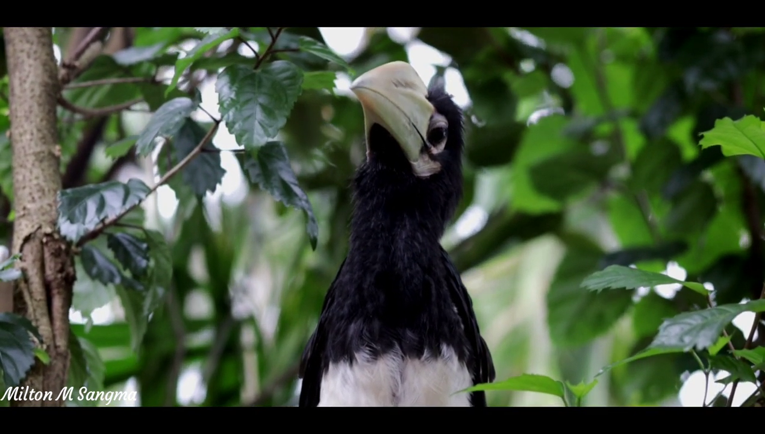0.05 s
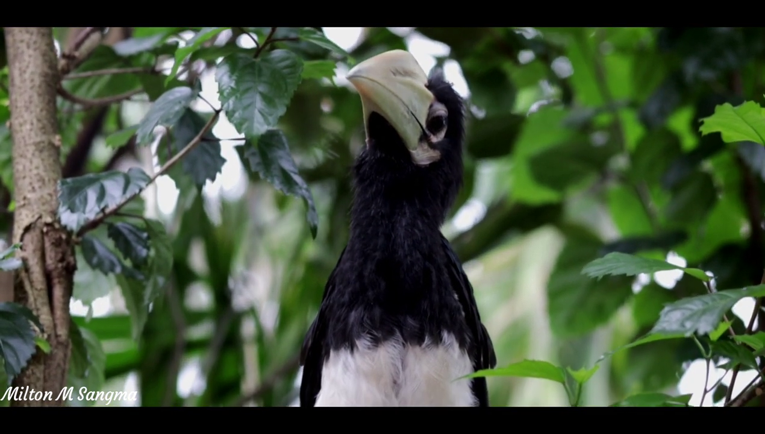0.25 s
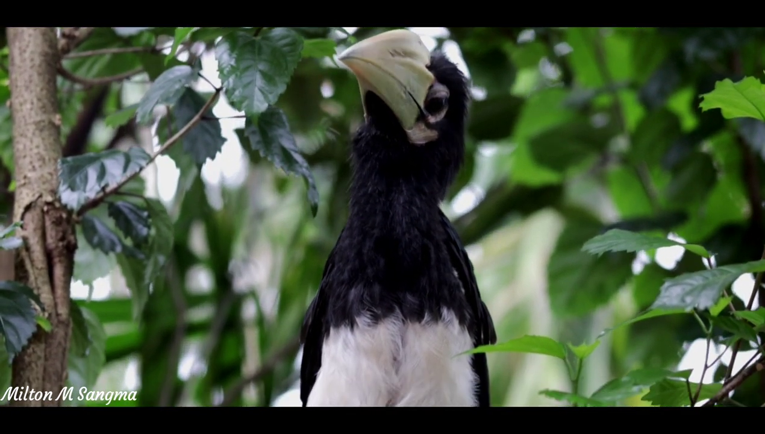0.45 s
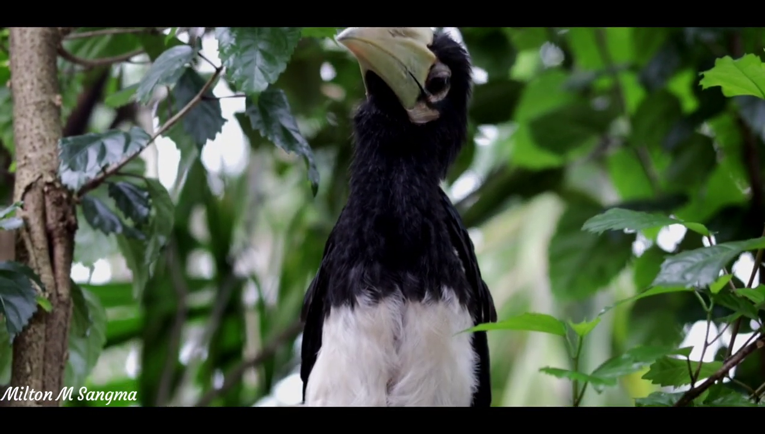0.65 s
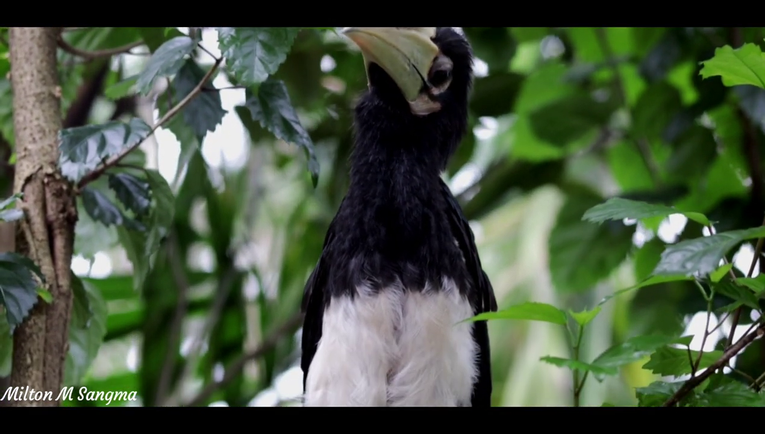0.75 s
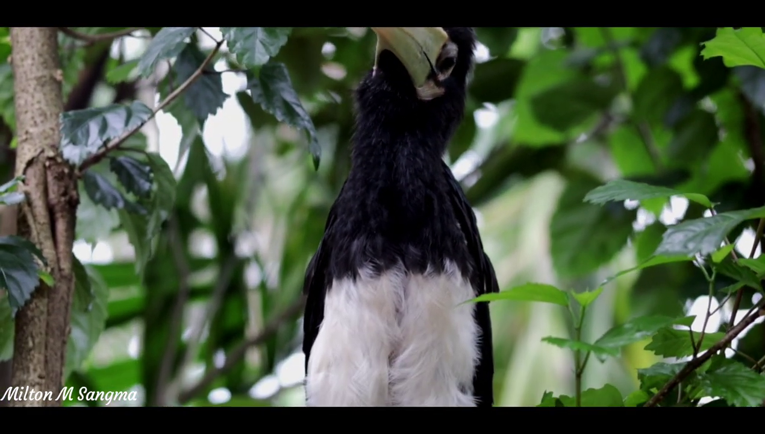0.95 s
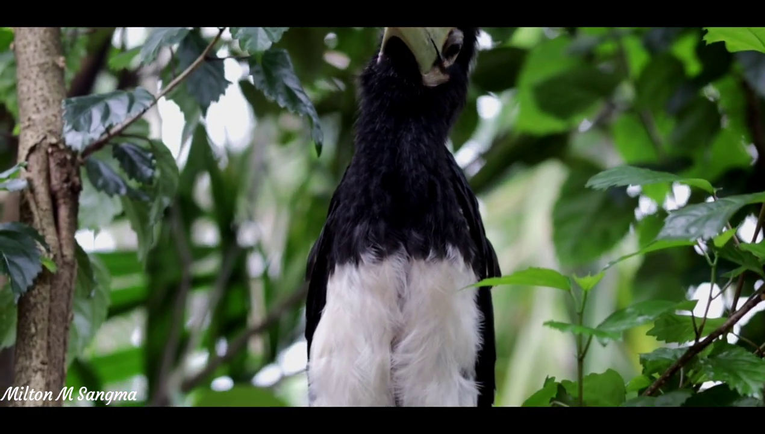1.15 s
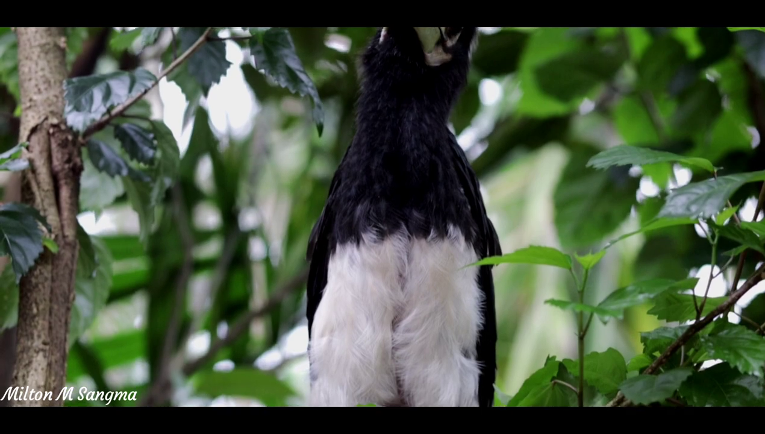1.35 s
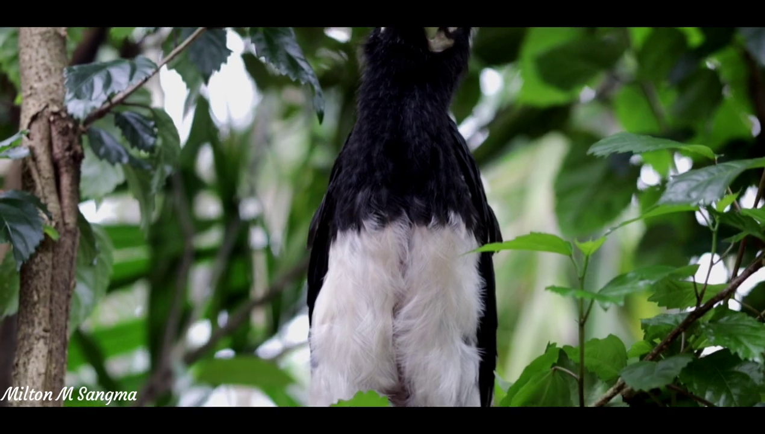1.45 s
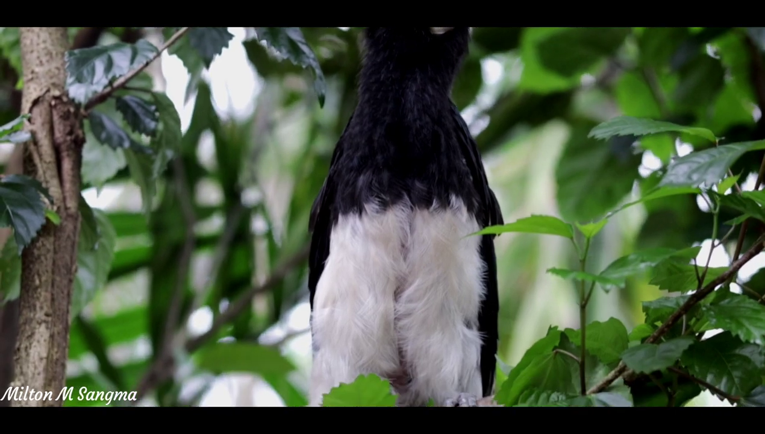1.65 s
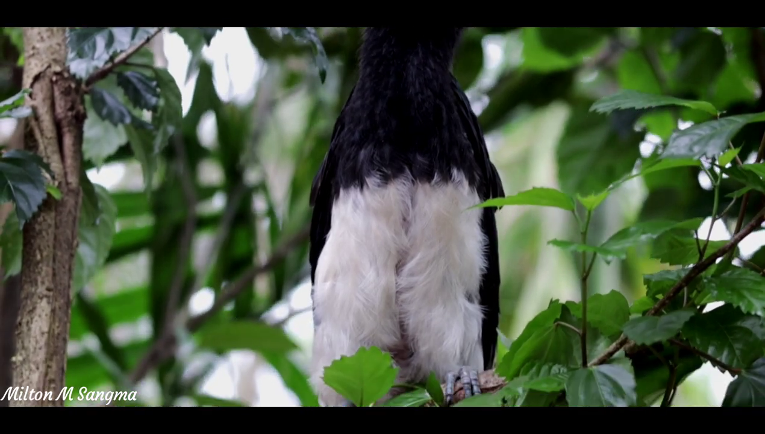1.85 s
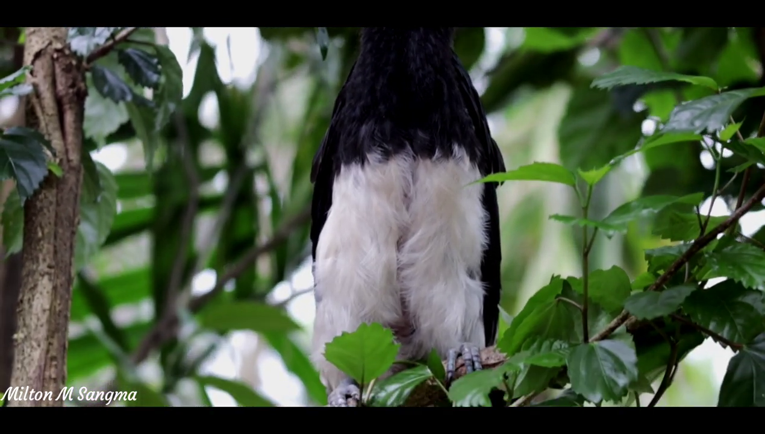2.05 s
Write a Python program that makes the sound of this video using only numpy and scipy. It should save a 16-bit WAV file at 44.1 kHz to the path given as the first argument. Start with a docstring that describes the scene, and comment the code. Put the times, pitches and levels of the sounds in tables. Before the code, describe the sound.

High-pitched birdsong echoes through a leafy forest, with three thin falling notes standing out.

```python
"""Thin high bird notes, chips and whistles open on a leafy forest; then one bird gives three falling
'tsee' notes over a distant warble; afterwards others pip and climb in pitch. Each note is a gliding,
nearly pure tone, and trunks and leaves scatter most of them into a flickering tail.
Behind them the forest hisses steadily; near the end leaves stir and twigs tick."""
import sys
import numpy as np
from scipy import signal
from scipy.fft import rfft, irfft
from scipy.io import wavfile
from scipy.ndimage import uniform_filter1d

SR = 44100
rng = np.random.default_rng(int(sys.argv[2]) if len(sys.argv) > 2 else 0)


def materialize(psi):
    """Save the field psi as 16-bit PCM at rate SR to the path in sys.argv[1].

    A 1-D psi becomes a single channel; in a 2-D psi each row is a channel.
    """
    bounded = np.clip(np.atleast_2d(psi).T, -1, 1)
    quanta = np.round(bounded * 32767).astype(np.int16)
    wavfile.write(sys.argv[1], SR, quanta)


N = 92610


def undb(db):
    """Decibels to gain."""
    return 10 ** (np.asarray(db) / 20)


def add(out, start_s, x):
    """Mix x in at a time."""
    i = int(np.clip(start_s * SR, 0, N - 1))
    out[i:i + len(x)] += x[:N - i]


def drift(rate_hz):
    """Smooth random modulation with a spread of 1."""
    width = max(int(SR / rate_hz), 2)
    y = uniform_filter1d(rng.standard_normal(N), width, mode="wrap")
    y = uniform_filter1d(y, width, mode="wrap")
    return y / y.std()


def tint(x, colour):
    """Shape x with an EQ curve; white noise keeps its level."""
    hz, db = np.array(colour).T
    bins_hz = np.maximum(np.fft.rfftfreq(N, 1 / SR), 1)
    gain = undb(np.interp(np.log(bins_hz), np.log(hz), db))
    return irfft(rfft(x) * gain / np.sqrt(np.mean(gain ** 2)), N)


def noise(colour):
    """Coloured noise, rms 1."""
    return tint(rng.standard_normal(N), colour)


def trees(x, scatter_db, scatter_s, tail_db, t60_s, direct=1, gap_s=0.001, tail_rise_s=0.014):
    """Direct sound (0 for a hidden bird), separate echoes off nearby trunks and a long diffuse tail."""
    t = np.arange(N) / SR
    sparse = rng.standard_normal(N) * (rng.random(N) < .03)
    early = sparse * np.exp(-t / scatter_s) * (t > gap_s)
    tail = rng.standard_normal(N) * np.exp(-np.log(1000) * t / t60_s)
    tail *= 1 - np.exp(-t / tail_rise_s)
    echo = undb(scatter_db) * early / np.linalg.norm(early) + undb(tail_db) * tail / np.linalg.norm(tail)
    mix = direct * x + signal.fftconvolve(x, echo)[:N]
    return mix / np.sqrt(direct ** 2 + np.sum(echo ** 2))


def syrinx(hz, waver, attack_s=0.0029, release_s=0.0047, octave_db=-34.5):
    """A bird's voice: a tone with a faint octave, its pitch unsteady by the fraction waver."""
    n = len(hz)
    t = np.arange(n) / SR
    phase = 2 * np.pi * np.cumsum(hz * (1 + waver * drift(363)[:n])) / SR
    gate = np.clip(t / attack_s, 0, 1) * np.clip((t[-1] - t) / release_s, 0, 1)
    tone = np.sin(phase) + undb(octave_db) * np.sin(2 * phase)
    return np.sin(gate * np.pi / 2) ** 2 * tone


def phrase(notes, waver):
    """Notes that each bend along a parabola through three pitches."""
    out = np.zeros(N)
    for start_s, length_s, first, middle, last, level_db in notes:
        u = np.linspace(-1, 1, int(length_s * SR))
        hz = middle + u * (last - first) / 2 + u ** 2 * ((first + last) / 2 - middle)
        add(out, start_s, undb(level_db) * syrinx(hz, waver))
    return out


# EQ of the forest bed: freq_hz, gain_db
HISS_COLOUR = [(30, -50), (170, -29), (280, -18), (450, -7), (800, 0.5), (1400, 0.5), (2200, -5),
               (4200, -1.5), (6000, -7), (9000, -14), (13000, -16.5), (15500, -21)]
def forest_hiss(level_db=-50.5):
    """A steady bed of far hiss."""
    return noise(HISS_COLOUR) * undb(level_db + 0.13 * drift(36))


# EQ of the rustle: freq_hz, gain_db
LEAF_COLOUR = [(200, -49), (700, -13.5), (1400, -10), (2700, 0), (5000, -3.5), (7000, -19), (10000, -19.5),
               (15500, -48)]
# Its fade-in: time_s, level_db
LEAF_SWELL = [(0, -83), (1.4, -73), (1.65, -50.5), (1.93, -45), (2.1, -50.5)]
def stirring_leaves():
    """Leaves stir into a fluttering rustle toward the end."""
    swell_db = np.interp(np.arange(N) / SR, *np.array(LEAF_SWELL).T)
    return noise(LEAF_COLOUR) * undb(swell_db + 2.8 * drift(45))


# EQ of the bright brush around the ticks: freq_hz, gain_db
BRUSH_EQ = [(300, -39), (1200, -3), (2500, 1), (5000, -9), (7000, 7), (10000, -3), (15000, -17)]
def leaf_brush(peak_s=1.895, width_s=0.06, level_db=-55):
    """Leaves rub together in a short crackly swell."""
    t = np.arange(N) / SR
    swell = np.exp(-((t - peak_s) / width_s) ** 2 / 2)
    return noise(BRUSH_EQ) * swell * undb(level_db + 2.5 * drift(150))


# Twig hits: start_s, level_db
TWIG_TICKS = [(1.922, -31), (1.97, -39)]
# Their woody EQ: freq_hz, gain_db
TWIG_COLOUR = [(150, -50), (500, -35), (950, -10), (1300, -2.5), (1850, -24), (4000, -16), (7000, -21.5),
               (15000, -32.5)]
def twigs(decay_s=0.0043):
    """Twigs tick softly, each a fast-dying burst of noise."""
    out, t = np.zeros(N), np.arange(N) / SR
    for start_s, level_db in TWIG_TICKS:
        add(out, start_s, undb(level_db) * rng.standard_normal(N) * np.exp(-t / decay_s))
    return trees(tint(out, TWIG_COLOUR), scatter_db=-12.5, scatter_s=0.018, tail_db=-12.5, t60_s=0.84)


# Faint low notes: start_s, length_s, first_hz, middle_hz, last_hz, level_db
LOW_NOTES = [(0, 0.24, 2560, 2548, 2565, -59.5), (.2, 0.28, 1760, 1890, 1865, -50),
             (.47, 0.23, 1860, 1850, 1886, -60), (.47, .15, 1490, 1520, 1537, -54),
             (.67, 0.069, 2113, 2210, 2320, -47.5), (.76, .13, 2270, 2310, 2333, -45),
             (.92, 0.17, 2310, 2300, 2322, -58.5), (1.17, 0.063, 2300, 2320, 2210, -51.5),
             (.6, 0.048, 2970, 2950, 3010, -46.5), (.99, 0.078, 2960, 2990, 2990, -48),
             (1.19, 0.066, 2994, 2980, 2950, -42.5)]
def low_whistles():
    """Whistles deep in the trees, washed in their tail."""
    return trees(phrase(LOW_NOTES, waver=0.0081), scatter_db=-9, scatter_s=0.011, tail_db=1, t60_s=1.0)


# Rough far notes: start_s, length_s, first_hz, middle_hz, last_hz, level_db
HOARSE_NOTES = [(.275, 0.038, 3330, 3440, 3180, -43), (.32, 0.021, 4870, 5160, 5340, -35),
                (1.94, 0.0385, 2867, 2920, 3270, -38), (1.972, 0.036, 3120, 3186, 3160, -33)]
def hoarse_bird():
    """A hidden bird, all echo; fast pitch jitter makes it rasp."""
    voice = phrase(HOARSE_NOTES, waver=0.0495)
    return trees(voice, scatter_db=-4, scatter_s=0.011, tail_db=-5, t60_s=1.0, direct=0)


# Up and down sweeps: start_s, length_s, first_hz, middle_hz, last_hz, level_db
WARBLE_NOTES = [(.54, 0.053, 5400, 5700, 5780, -49.5), (.642, .035, 3436, 3950, 3520, -33),
                (.746, 0.026, 4350, 5190, 7500, -32.5), (.772, 0.024, 6200, 5030, 4460, -62),
                (.79, .028, 4016, 3600, 2950, -35.5), (.835, .035, 3390, 4000, 5080, -34),
                (.91, .04, 4100, 4900, 6550, -38), (.97, 0.019, 6200, 5200, 4440, -36),
                (1.022, .045, 3147, 3750, 4673, -31), (1.13, 0.074, 6230, 5200, 4420, -39.5),
                (1.224, 0.033, 3206, 3750, 4630, -26.5), (1.275, 0.061, 4700, 4300, 4350, -33),
                (1.31, 0.098, 3500, 3700, 3500, -37), (1.35, .04, 5020, 5600, 6260, -39.5),
                (1.39, 0.035, 3325, 3050, 3260, -36.5), (1.43, 0.027, 3567, 3900, 5100, -25.5),
                (1.455, 0.031, 3746, 3550, 3410, -26), (1.52, 0.027, 3410, 3600, 3780, -31),
                (1.57, 0.0434, 3512, 3750, 3940, -28.5), (1.55, 0.055, 5600, 5550, 5280, -44.5),
                (1.67, 0.066, 5600, 5500, 5300, -75), (1.66, 0.018, 3760, 3750, 4300, -42),
                (1.775, 0.024, 3786, 3600, 3550, -34), (2.06, 0.038, 4770, 4800, 5200, -41.5)]
def warbling_bird():
    """A distant wavering song, more echo than direct sound."""
    voice = phrase(WARBLE_NOTES, waver=0.0336)
    return trees(voice, scatter_db=2, scatter_s=0.019, tail_db=3.5, t60_s=0.86, direct=0.78)


# A quick run of pips: start_s, level_db
PIP_NOTES = [(1.526, -37), (1.597, -34.5), (1.666, -39), (1.729, -48), (1.789, -37.5), (1.851, -39),
             (1.919, -41)]
def pip_bird(length_s=0.0226, top_hz=2880, fall_hz=256):
    """A far bird repeats one short falling note."""
    out = np.zeros(N)
    hz = top_hz - fall_hz * np.linspace(0, 1, int(length_s * SR))
    for start_s, level_db in PIP_NOTES:
        add(out, start_s, undb(level_db) * syrinx(hz, waver=0.03))
    return trees(out, scatter_db=-5, scatter_s=0.028, tail_db=1, t60_s=0.52)


# Sustained notes: start_s, length_s, first_hz, middle_hz, last_hz, level_db
HELD_NOTES = [(.08, .055, 3540, 3520, 3600, -50.5), (.435, 0.09, 3570, 3550, 3580, -44.5),
              (.5, .135, 3550, 3550, 3570, -36.5), (.632, 0.092, 3550, 3644, 3560, -44)]
def held_tones():
    """Pure, almost level tones, left dry."""
    return phrase(HELD_NOTES, waver=0.0012)


# Three short notes and a long one: start_s, length_s, first_hz, middle_hz, last_hz, level_db
STUTTER_NOTES = [(.184, 0.027, 3710, 3820, 3800, -36), (.199, 0.029, 3774, 3830, 3900, -28.5),
                 (.229, .03, 3770, 3790, 3850, -25.5), (.262, 0.11, 3770, 3795, 3844, -31)]
def stuttering_whistle():
    """A whistle stutters around one pitch and rings on in the trees."""
    voice = phrase(STUTTER_NOTES, waver=0.0075)
    return trees(voice, scatter_db=-14, scatter_s=0.041, tail_db=-2, t60_s=1.0)


# The late rising phrase: start_s, length_s, first_hz, middle_hz, last_hz, level_db
CLIMB_NOTES = [(1.516, 0.018, 3750, 3600, 3460, -21), (1.598, 0.021, 3854, 3942, 3900, -25),
               (1.665, 0.027, 4005, 3905, 3770, -24.5), (1.712, 0.05, 3924, 4010, 3840, -30.5),
               (1.748, 0.026, 4065, 3923, 4200, -31.5), (1.795, 0.028, 3965, 4107, 4080, -32),
               (1.835, 0.031, 4076, 4100, 4100, -35)]
def climbing_bird():
    """Short notes edge upward, smeared by strong trunk echoes."""
    voice = phrase(CLIMB_NOTES, waver=0.016)
    return trees(voice, scatter_db=0.5, scatter_s=0.028, tail_db=-3, t60_s=1.0)


# Chips and slurs: start_s, length_s, first_hz, middle_hz, last_hz, level_db
CHIP_NOTES = [(.257, 0.046, 4050, 4505, 4600, -28), (.314, 0.014, 3970, 4280, 5700, -23.5),
              (.35, 0.039, 4100, 4250, 4100, -36), (.373, 0.04, 4275, 4450, 4260, -21),
              (.412, 0.045, 4467, 4440, 4360, -29), (.475, .065, 4300, 4410, 4630, -34.5)]
def chipping_bird():
    """A tight cluster of calls from the middle distance."""
    return trees(phrase(CHIP_NOTES, waver=0.016), scatter_db=-1, scatter_s=0.013, tail_db=-3, t60_s=1.0)


# Thin high notes: start_s, length_s, first_hz, middle_hz, last_hz, level_db
THIN_NOTES = [(.002, .046, 4410, 4510, 4370, -41.5), (.048, 0.027, 4270, 4590, 4970, -36),
              (.07, 0.0145, 6900, 5910, 5360, -38.5), (.105, 0.013, 5180, 6200, 5460, -44.5),
              (.164, 0.045, 6750, 6790, 6890, -44), (.212, 0.028, 7500, 7550, 7740, -34),
              (.274, 0.0093, 5440, 7460, 8150, -41), (.291, 0.0063, 7130, 7930, 7900, -33),
              (.39, 0.015, 3900, 3510, 2900, -41), (.686, 0.018, 6500, 6950, 6250, -46),
              (.707, 0.015, 4900, 6500, 8190, -38), (.719, 0.022, 8500, 8200, 8422, -31.5)]
def thin_calls():
    """The near bird twitters with only a short, light tail."""
    voice = phrase(THIN_NOTES, waver=0.014)
    return trees(voice, scatter_db=-5, scatter_s=0.0065, tail_db=-6, t60_s=0.44)


# The three lead notes: start_s, length_s, top_hz, end_hz, base_level_db
TSEE_NOTES = [(.761, .085, 8197, 6592, -22.5), (.937, .087, 8057, 6487, -24.5),
              (1.128, .090, 7940, 6560, -24)]
# Their shared contour: note_fraction, fall_fraction, gain_db
TSEE_CONTOUR = [(0, 0, -2), (.15, .03, 2.5), (.32, .21, -2.5), (.46, .35, -2), (.64, 0.44, 5),
                (0.792, .59, 8), (0.898, 1, -1), (1, 0.95, -18)]
def tsee_bird(flick_hz=2068, flick_s=0.0018):
    """Each note flicks up to its top, slides down, lingers at its loudest and drops away."""
    out = np.zeros(N)
    position, fall, swell_db = np.array(TSEE_CONTOUR).T
    for start_s, length_s, top_hz, end_hz, base_db in TSEE_NOTES:
        u = np.linspace(0, 1, int(length_s * SR))
        slide = top_hz + (end_hz - top_hz) * np.interp(u, position, fall)
        flick = flick_hz * np.exp(-u * length_s / flick_s)
        envelope = undb(base_db + np.interp(u, position, swell_db))
        add(out, start_s, envelope * syrinx(slide - flick, waver=0.0121))
    return trees(out, scatter_db=2, scatter_s=0.02, tail_db=-1.5, t60_s=0.75)


def scene():
    """A mono mix of the birds, each at its own depth, over twigs, leaves and hiss."""
    birds = thin_calls() + chipping_bird() + climbing_bird() + stuttering_whistle() + held_tones()
    birds += low_whistles() + warbling_bird() + hoarse_bird() + tsee_bird() + pip_bird()
    return (birds + twigs() + leaf_brush() + forest_hiss() + stirring_leaves())[None]


def record(dry):
    """A steep low-pass cuts the very top."""
    cutoff_hz = 15450
    return signal.sosfilt(signal.ellip(10, .2, 70, cutoff_hz, fs=SR, output="sos"), dry)


dry = scene()
out = record(dry)
materialize(out)
```